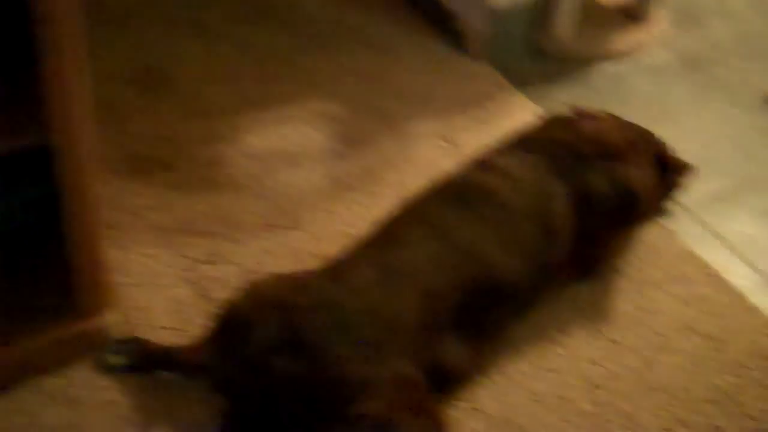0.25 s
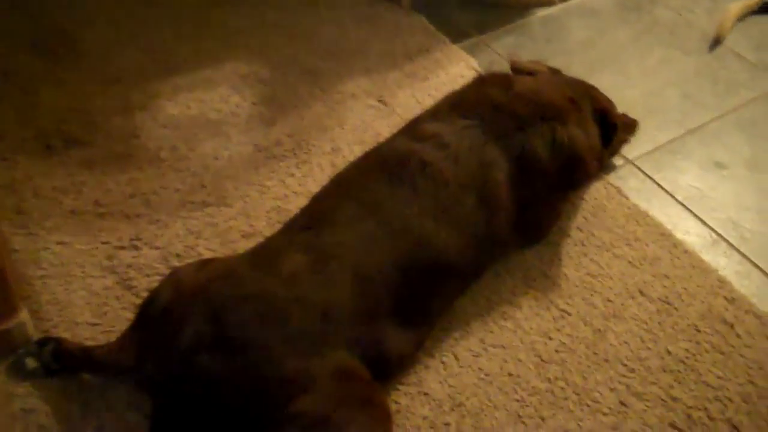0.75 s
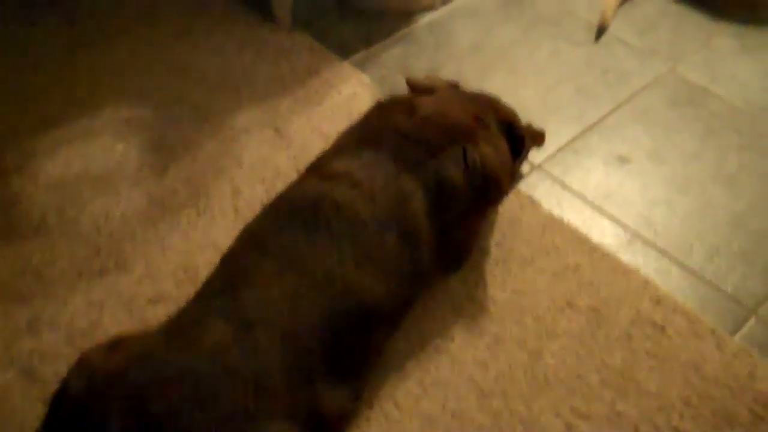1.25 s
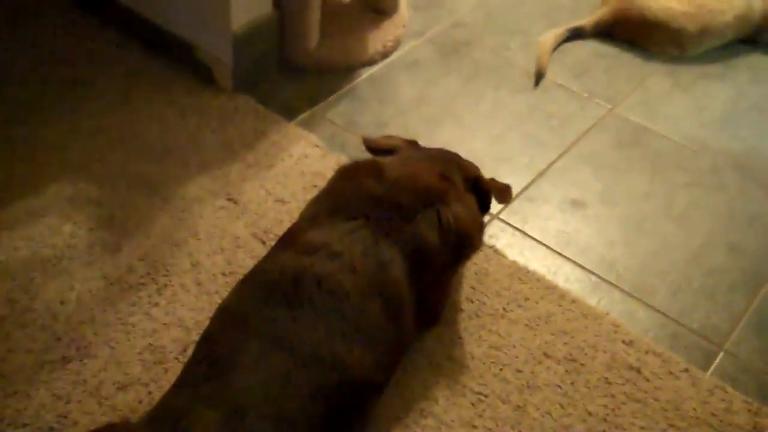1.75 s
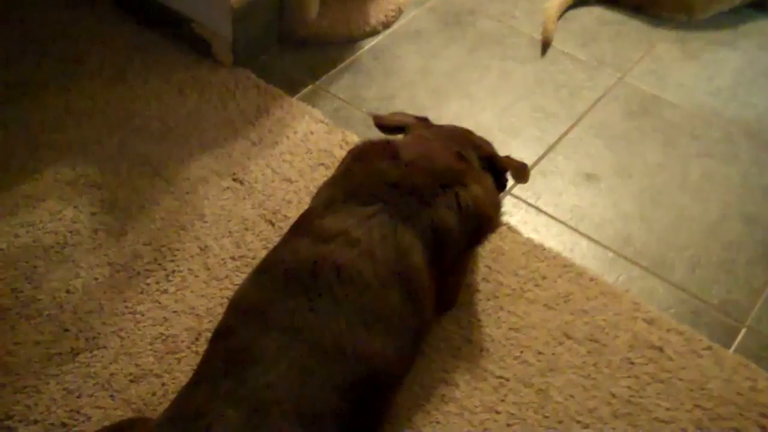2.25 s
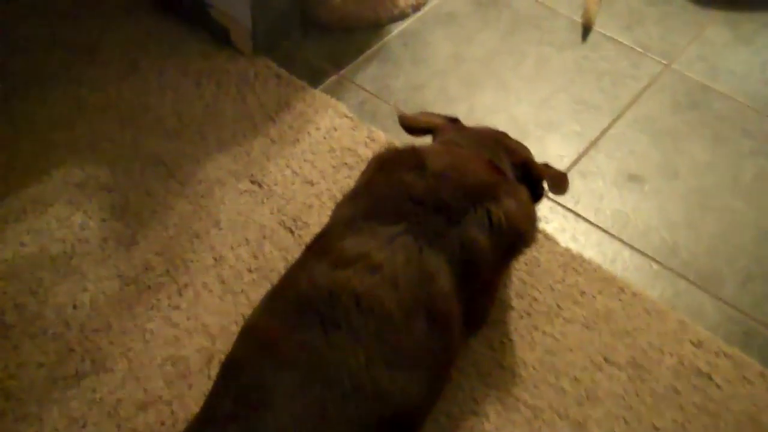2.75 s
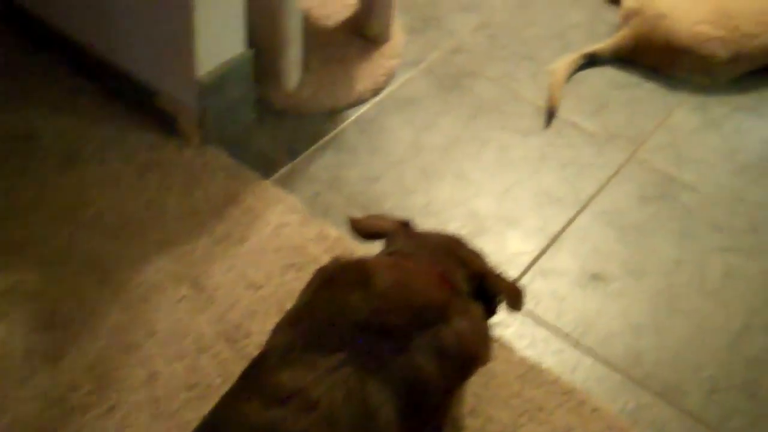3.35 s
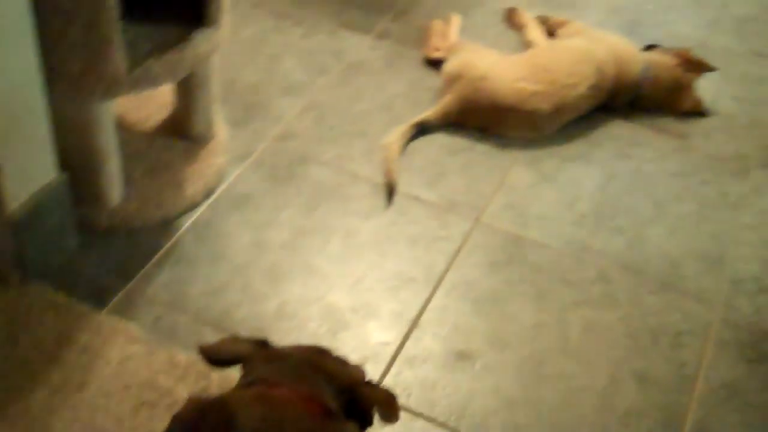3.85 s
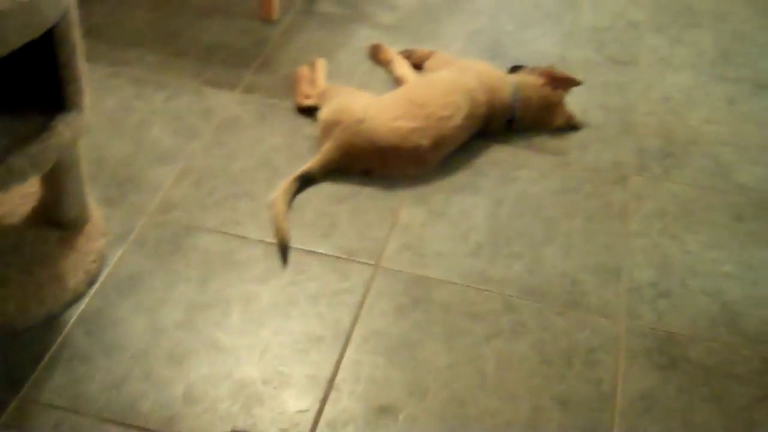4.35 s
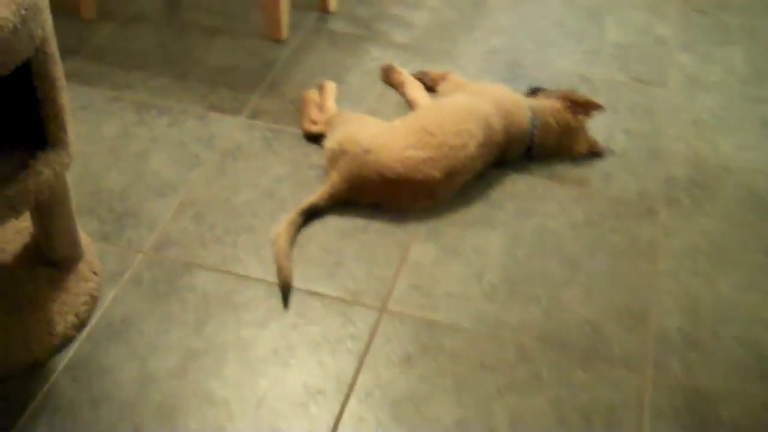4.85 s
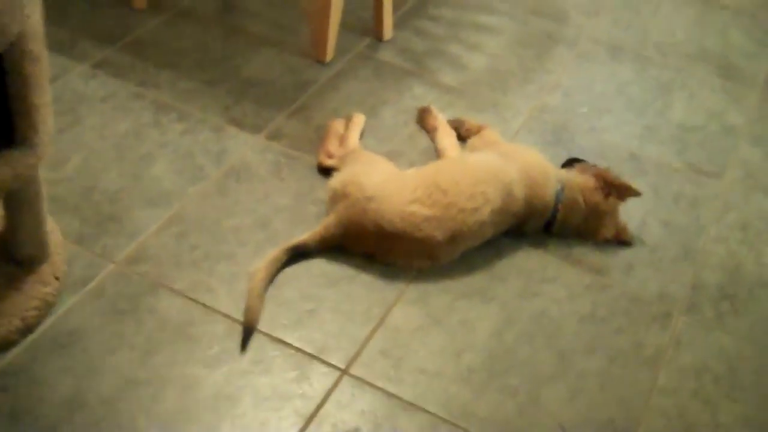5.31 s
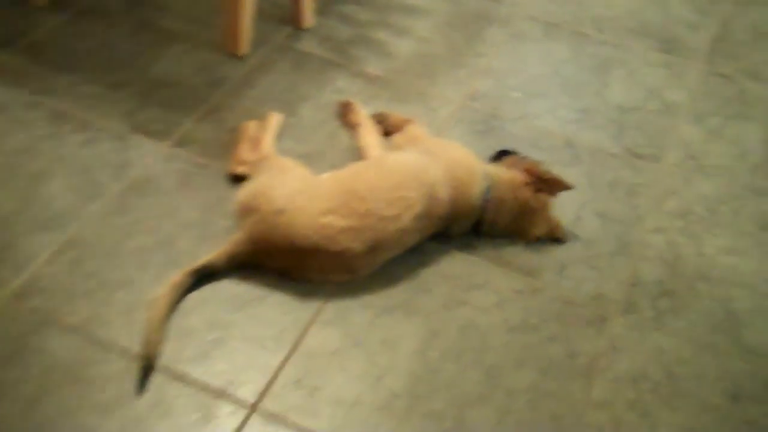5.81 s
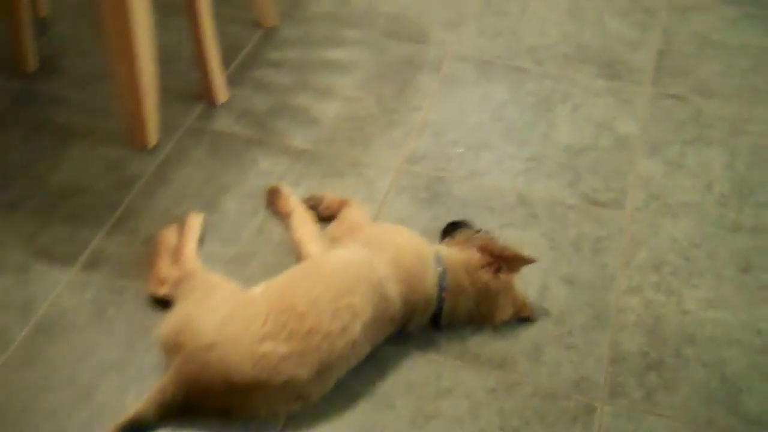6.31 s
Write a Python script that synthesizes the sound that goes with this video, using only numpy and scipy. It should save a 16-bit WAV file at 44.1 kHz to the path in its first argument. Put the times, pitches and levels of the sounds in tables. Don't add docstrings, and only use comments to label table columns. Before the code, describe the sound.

A small camera close to a dog picks up hiss and low hum, with faint paw pats and fur rustle. A sudden head shake sets thin metal tags chattering rapidly, with fleshy ear flaps underneath. Scattered clinks die down, a few dull paw knocks come, then the tags jingle once more, briefly, in a short hard-floored indoor reverb.

```python
import sys
import numpy as np
from scipy import signal
from scipy.fft import rfft, irfft, next_fast_len
from scipy.io import wavfile
from scipy.ndimage import uniform_filter1d, map_coordinates

SR = 44100
rng = np.random.default_rng(int(sys.argv[2]) if len(sys.argv) > 2 else 0)


def amplitude_ratio(level_db):
    exponent = np.asarray(level_db, float) / 20
    return 10 ** exponent


def generate_wav(signal):
    frames = np.transpose(np.atleast_2d(signal))
    scaled = np.clip(frames, -1, 1) * 32767
    pcm = np.round(scaled).astype(np.int16)
    wavfile.write(sys.argv[1], SR, pcm)


N = 289858

# hz, density_db_per_hz
HISS_COLOUR = [(18, -42), (30, -17), (91, -7.5), (131, 0), (271, -6.5), (360, -4.5), (409, -9.5),
               (867, -7.5), (1210, -13.5), (1660, -13), (3510, -16), (6690, -14.5), (8900, -24.5),
               (13500, -28), (14600, -29)]
# time_s, level_db
HISS_LEVEL = [(0, -55.5), (2, -55.5), (4, -53.5), (5.3, -52.5), (6.57, -54)]
# pitch_hz, rms_db
FRIDGE_HUM = [(58.6, -66.5), (117.5, -63), (235, -67.5)]
# hz, likeness_0_to_1
PORT_LIKENESS = [(60, 0.81), (150, 0.94), (370, 0.87), (920, 0.77), (2280, 0.94), (5680, 0.039),
                 (14100, 0.03)]
# hz, left_over_right_db
PORT_LEAN = [(60, -4), (150, 1.5), (370, 1.5), (920, 1), (2280, 0.5), (5680, -0.5), (14100, 5)]
# hz, left_over_right_db
DOG_SIDE = [(300, -3.5), (4000, -9.5), (7000, 3), (10000, 2.5), (12000, 11.5), (14000, 16.5)]
# hz, t60_s
TILE_DECAY = [(200, 0.21), (1000, 0.29), (6900, 0.33), (14000, 0.14)]
# hz, density_db_per_hz
FUR_COLOUR = [(250, -12), (500, -5.5), (1200, -4), (3500, -8), (6700, -0.5), (9000, -16), (14000, -39.5)]
# start_s, peak_db, t60_s
STROKES = [(0.0, -67, 0.94), (0.59, -57, 2.9), (1.33, -55, 0.64), (1.38, -49, 0.35), (1.85, -47.5, 5.6),
           (2.44, -38, 0.96), (2.6, -48, 1.1), (2.72, -38, 0.33), (2.94, -65, 0.69), (3.3, -60.5, 4.5),
           (3.82, -49.5, 1.1), (4.07, -46, 0.46), (4.4, -46.5, 1.07), (4.7, -45.5, 0.5), (5.06, -56, 1.3),
           (5.16, -54, 1.5)]
# start_s, peak_db
CLICKS = [
    (0.2175, -41),
    (0.2232, -33.5),
    (0.8955, -41),
    (4.3345, -38),
    (5.0655, -31),
]
# start_s, peak_db, centre_hz, t60_s
PAWS = [(0.213, -50, 226, 0.039), (0.6, -46.5, 147, 0.133), (1.139, -46, 400, 0.086),
        (1.379, -44, 970, 0.2), (3.595, -67, 237, 0.1), (3.869, -63, 385, 0.081), (4.09, -40, 322, 0.094),
        (4.417, -35, 670, 0.1), (4.446, -29.5, 408, 0.19), (4.488, -34, 377, 0.037), (4.7, -41, 326, 0.16),
        (4.807, -34.5, 355, 0.2), (6.211, -45, 213, 0.1), (6.319, -56, 310, 0.1)]
# start_s, peak_db, centre_hz, t60_s
EAR_SLAPS = [
    (1.987, -30, 952, 0.4),
    (2.095, -18.5, 410, 0.033),
    (2.198, -18.5, 717.6, 0.2),
    (2.293, -20.5, 1667, 0.12),
    (2.382, -16.5, 878.5, 0.1),
    (2.469, -31, 960, 0.072),
    (2.557, -32.5, 1750, 0.16),
    (2.638, -30.5, 358, 0.15),
    (2.725, -34.5, 1130, 0.12),
]
# pitch_hz, level_db, t60_s
THICK_TAG = [(4520, -25, 0.4), (6930, 0, 0.26), (6912, 1.5, 0.11), (6900, -6.5, 0.175), (7650, -30, 0.106),
             (10030, -5, 0.36)]
# pitch_hz, level_db, t60_s
THIN_TAG = [(5760, -8, 0.084), (5903, -5, 0.2), (6220, -12.5, 0.17), (6830, -8.5, 0.14), (9040, -18, 0.081),
            (10100, -12, 0.17), (10660, -5, 0.12), (12390, -22, 0.04), (12680, -15, 0.14),
            (13300, -18.5, .07), (14100, -17.5, 0.12)]
# hz, density_db_per_hz
CONTACT_COLOUR = [(1470, -24.5), (2500, -15), (3980, -11), (4440, -7), (4960, -9.5), (6860, 9), (7440, 0),
                  (8620, -3), (11000, -15), (11600, -19.5), (14600, -23)]
# start_s, peak_db, thin_over_thick_db, edge_brightness_db
FAINT_STRIKES = [
    (0.893, -49.5, -18, -10),
    (1.7245, -44, 7, -3),
    (4.334, -38.5, -10, -12),
    (4.597, -51, -10, 0),
]
WINDUP_STRIKES = [(1.7327, -31.5, -1.5, -13), (1.7622, -40.5, 8.5, 0), (1.821, -35, 1, -11),
                  (1.842, -47, -11.5, 14), (1.862, -48.5, -2, 11.5), (1.9155, -37.5, -16, 0.5),
                  (1.927, -49, -16, -3), (1.9438, -53, -3.5, -7), (1.9741, -40, 0, 0.5),
                  (2.0247, -33, 0, -7), (2.028, -15, -31, -13)]
SHAKE_STRIKES = [(2.054, -4.5, -7.5, -8), (2.0854, -28, -10, -4), (2.1317, -15, -9, -6),
                 (2.18, -18, -1, -16), (2.1898, -23, -4, -9.5), (2.218, -12, -15, -9),
                 (2.244, -18.5, -20, -9), (2.2807, -15, -6, -6), (2.3125, -15, -6, -5.5),
                 (2.3285, -13, -15, -12), (2.364, -13, -1.5, -11), (2.394, -10, -12, -13),
                 (2.444, -14.5, -16, -13), (2.465, -9, -12, -15.5), (2.514, -9, -15, -12.5),
                 (2.5786, -13, -10, -14), (2.6009, -10.5, -20, -10), (2.6268, -19, -22, -38),
                 (2.6417, -16.5, -20, -35), (2.6795, -13, -3, -8.5), (2.705, -12.5, -10.5, -14),
                 (2.734, -18.5, -12, -19), (2.7587, -12, -25, -26), (2.7826, -13.5, -18, -21),
                 (2.8219, -31, -22.5, -20), (2.8488, -24, -30, -15.5)]
SETTLE_STRIKES = [(2.888, -26, -21, -21), (2.9266, -24.5, 12.5, -10), (2.934, -24.5, 5, -9.5),
                  (2.9506, -18.5, -22.5, -17), (2.9727, -26, -3, -11.5), (3.015, -31, -13, -8),
                  (3.046, -24.5, -15, -11.5), (3.0847, -37, -19, -23), (3.1095, -30.5, -11.5, -16),
                  (3.1214, -30, -24, -18), (3.147, -29.5, -23, -20), (3.163, -24, -21, -20),
                  (3.183, -29, -32, -16.5), (3.2197, -61, -14, -16), (3.262, -59, -2, -13),
                  (3.2956, -20.5, -14, -14.5), (3.304, -10.5, -24, -27), (3.366, -29.5, -18, -22)]
LATE_STRIKES = [(4.948, -44.5, -4, 0.5), (4.9726, -62, -14, -15), (5.0347, -32.5, -4, -20),
                (5.065, -12, -11.5, -21.5), (5.0772, -23, -15.5, -24), (5.0856, -10, -9, -27),
                (5.0997, -21, -18, -28), (5.118, -32, -12.5, -24), (5.1465, -30, 3, -10),
                (5.163, -32.5, 1, -10.5), (5.1935, -22.5, -5.5, -12.5), (5.217, -23.5, -8, -26),
                (5.2352, -30.5, -9, -23), (5.2715, -21, -16, -21.5), (5.2878, -23.5, -21, -25),
                (5.3073, -33, -21, -24), (5.325, -39, -16, -28), (5.385, -41, -18, -28)]
# time_s, pan_left_db, slack_db (slack lets the tags chatter)
COLLAR = [(0.9, 13, 0), (1.73, 8, -0.5), (1.85, 5, -6), (1.95, 3, -2), (2.1, 7.5, 0), (2.22, 11, -0.5),
          (2.33, 7, -1.5), (2.48, 14.5, -1), (2.6, 9, -1), (2.8, 13, 1.5), (2.95, 10, -0.5),
          (3.17, 23.5, 0.5), (3.3, 6.5, -2), (4.3, 13, 4), (4.6, 6, 11.5), (5.06, -3, 1), (5.19, 5.5, 1),
          (5.4, 14, -5)]
# centre_hz, width_hz, depth_db
THINNED_BANDS = [(3700, 600, 13), (4900, 400, 10), (11450, 300, 7)]


def unit(x):
    return x / np.sqrt(np.mean(x ** 2) + 1e-20)


def along(points, hz):
    f, v = np.transpose(points)
    return np.interp(np.log(hz + 1), np.log(f + 1), v)


def curve(rows):
    s, v = np.transpose(rows)
    return np.interp(np.arange(N) / SR, s, v, left=-150, right=-150)


def wobble(rate_hz):
    knots = rng.standard_normal(int(N * rate_hz / SR) + 4)
    return map_coordinates(knots, [np.arange(N) * rate_hz / SR])


def filtered(x, response):
    m = next_fast_len(x.shape[-1] + 8192)
    return irfft(rfft(x, m) * response(np.fft.rfftfreq(m, 1 / SR)), m)[..., :x.shape[-1]]


def resonance(f, centre, width):
    return 1j * f * width / (centre ** 2 - f ** 2 + 1j * f * width)


def add(track, s, sound):
    part = track[..., round(s * SR):][..., :sound.shape[-1]]
    part += sound[..., :part.shape[-1]]


def dying(events, rise_s):
    out, t = np.zeros(N), np.arange(SR) / SR
    for s, db, t60 in events:
        rise = 1 - np.exp(-t / max(rise_s, 1e-4))
        add(out, s, amplitude_ratio(db - 60 * t / max(t60, .02)) * rise * (1 - t))
    return out


def paired(pair, colour):
    turn = lambda hz: np.arccos(np.clip(along(PORT_LIKENESS, hz), -1, 1)) / 2
    mid, side = filtered(pair, lambda hz: colour(hz) * [np.cos(turn(hz)), np.sin(turn(hz))])
    return np.array([mid + side, mid - side])


def background():
    z = signal.stft(rng.standard_normal((2, N)), nperseg=512)[2]
    patches = uniform_filter1d(rng.standard_normal(z.shape[1:]), size=12, axis=0)
    patches = uniform_filter1d(patches, size=16, axis=1)
    pair = signal.istft(z * amplitude_ratio(1.5 * unit(patches)), nperseg=512)[1][:, :N]
    hiss = unit(paired(pair, lambda hz: amplitude_ratio(along(HISS_COLOUR, hz))))
    hiss = amplitude_ratio(curve(HISS_LEVEL) + 1.0) * hiss
    t, hum = np.arange(N) / SR, 0
    for hz, db in FRIDGE_HUM:
        level = np.sqrt(2) * amplitude_ratio(db + 3.8 * wobble(7.8))
        hum = hum + level * np.sin(2 * np.pi * hz * t + .4 * wobble(2.6))
    return hiss + hum


def room(x, wet_db, reach):
    out, hop = np.zeros((2, N + SR)), SR // 8
    window = np.hanning(2 * hop + 1)[:-1]
    padded = np.pad(x, (hop, 2 * hop))
    for start in range(0, N, hop):
        hz, tail_s, z = signal.stft(rng.standard_normal((2, SR // 2)), SR, nperseg=64)
        decay = amplitude_ratio(-60 * tail_s / (reach * along(TILE_DECAY, hz)[:, None]))
        tail = paired(signal.istft(z * decay, SR, nperseg=64)[1], np.ones_like)
        piece = padded[start:start + 2 * hop] * window
        add(out, start / SR, signal.fftconvolve(piece[None], tail / np.linalg.norm(tail[0]), axes=1))
    return amplitude_ratio(wet_db) * out[:, hop:hop + N]


def brushing():
    grain = amplitude_ratio(2.0 * wobble(60)) * rng.standard_normal((2, N))
    ears = dying([(s, db - 11, 0.33) for s, db, _, _ in EAR_SLAPS], rise_s=0.0088)
    stirring = amplitude_ratio(-66)
    level = stirring + ears + dying(STROKES, rise_s=0.02)
    return level * unit(paired(grain, lambda hz: amplitude_ratio(along(FUR_COLOUR, hz))))


def clicks():
    out, t = np.zeros((2, N)), np.arange(SR // 100) / SR
    for s, db in CLICKS:
        puff = amplitude_ratio(-60 * t / 0.004) * rng.standard_normal((2, len(t)))
        tick = filtered(puff, lambda f: resonance(f, 5000, 4300) ** 2)
        add(out, s, amplitude_ratio(db + np.array([[6], [-6]])) * tick / np.abs(tick).max())
    return out


def thuds(events, sharpness, snap_db, low_hz):
    out, t = np.zeros(N), np.arange(SR // 4) / SR
    for s, db, hz, t60 in events:
        puff = amplitude_ratio(-60 * t / max(t60, .01)) * (1 - np.exp(-t / 0.0059)) * rng.standard_normal(len(t))
        tone = lambda f: resonance(f, hz, hz / sharpness) ** 2 + amplitude_ratio(snap_db) * resonance(f, 800, 2400) ** 2
        body = filtered(puff, lambda f: tone(f) * (1j * f / (low_hz + 1j * f)) ** 3)
        add(out, s, amplitude_ratio(db) * body / np.abs(body).max())
    return out


def strikes():
    rows = sorted(WINDUP_STRIKES + SHAKE_STRIKES + SETTLE_STRIKES + LATE_STRIKES + FAINT_STRIKES)
    s, db, thin_db, bright_db = np.transpose(rows)
    at, pan_db, slack_db = np.transpose(COLLAR)
    flight_s = np.diff(s, append=9)
    damping = 0.8 + 6 * np.minimum(flight_s, 0.05)
    chatter_db = db + bright_db + np.interp(s, at, slack_db) - 7
    return np.transpose([s, db, np.interp(s, at, pan_db), thin_db, bright_db, damping, flight_s, chatter_db])


def chatter():
    contacts = (rng.random(N) < 3000 / SR) * amplitude_ratio(3.36 * wobble(90)) * rng.standard_normal(N)
    level = dying([(s, db, 0.3) for s, *_, db in strikes()], rise_s=0.0058)

    def colour(f):
        metal = amplitude_ratio(0.5)
        for k, (hz, db, _) in enumerate(THICK_TAG + THIN_TAG):
            metal = metal + (-1) ** k * amplitude_ratio(db) * resonance(f, hz, 80)
        return amplitude_ratio(along(CONTACT_COLOUR, f)) * metal

    band = np.std(filtered(contacts, lambda f: colour(f) * (abs(f - 8500) < 1000)))
    return amplitude_ratio(-3.5) * filtered(level * contacts / band, colour) * amplitude_ratio([[2.5], [-2.5]])


def ring(modes, t, damping, bright_db, swing, twirl_hz):
    hz, db, t60 = np.transpose(modes)[:, :, None]
    chance = rng.standard_normal((5, len(modes), 1))
    fade_db = 60 * t / (t60 * np.clip(damping, .1, 3))
    level = db + 3 * chance[0] + bright_db * (hz > 8500) - fade_db
    twirl = 1 + 0.6 * np.cos(2 * np.pi * twirl_hz * amplitude_ratio(3.59 * chance[3]) * t + 1.5 * chance[4])
    tone = np.sin(2 * np.pi * hz * (1 + swing * chance[1]) * t + 3 * chance[2])
    return np.sum(amplitude_ratio(level) * twirl * tone, axis=0)


def tags():
    out, t = np.zeros((2, N)), np.arange(SR * 2 // 5) / SR
    for s, db, pan_db, thin_db, bright_db, damping, flight_s, _ in strikes():
        thick = ring(THICK_TAG, t, damping, bright_db, swing=0.002, twirl_hz=28.2)
        thin = ring(THIN_TAG, t, damping, bright_db - thin_db, swing=.008, twirl_hz=89.6)
        thin = amplitude_ratio(thin_db + 6.5) * thin
        burst = amplitude_ratio(bright_db + 21.5 - 60 * t / 0.027) * rng.standard_normal(len(t))
        crack = filtered(burst, lambda f: amplitude_ratio(along(CONTACT_COLOUR, f)))
        choke = amplitude_ratio(-9 * np.clip((t - flight_s) / 0.0015 + 1, 0, 1))
        onset = 1 - np.exp(-t / 0.00089)
        strike = amplitude_ratio(db - 10) * onset * choke * (thick + thin + crack)
        add(out, s, strike * amplitude_ratio([[pan_db / 2], [-pan_db / 2]]))
    return out


def scene():
    metal = tags() + chatter()
    ears = thuds(EAR_SLAPS, sharpness=1.16, snap_db=-3, low_hz=196.8)
    paws = thuds(PAWS, sharpness=1.03, snap_db=-18.5, low_hz=79.3)
    skin = ears + paws
    centre = metal.mean(axis=0)
    near_walls = room(centre, wet_db=-2.0, reach=0.059) * amplitude_ratio([[3], [-3]])
    scattered = amplitude_ratio(-4) * metal + near_walls
    near = filtered(scattered, lambda f: amplitude_ratio(np.outer([.5, -.5], along(DOG_SIDE, f)))) + skin
    far = room(centre, wet_db=-3, reach=0.59) + room(skin, wet_db=-6.0, reach=1.0)
    return near + far + brushing() + background() + clicks()


def thinned(x, under_db, low_hz):
    mid, side = (x[0] + x[1]) / 2, (x[0] - x[1]) / 2
    hz, _, z = signal.stft(mid, SR, window="cosine", nperseg=2048)
    edges = np.arange(0, len(hz), 16)
    power = np.add.reduceat(abs(z) ** 2, edges)
    treble = np.median(power[(hz[edges] > 5200) & (hz[edges] < 14000)], axis=0)
    poor_db = 0
    for centre, width, db in THINNED_BANDS:
        poor_db = poor_db + db * np.exp(-((hz[edges] + 170 - centre) / width) ** 2)
    mood_db = 4 * unit(uniform_filter1d(rng.standard_normal(power.shape), size=3, axis=1))
    kept = power > amplitude_ratio(2 * (under_db + poor_db[:, None] + mood_db)) * treble
    kept = kept[np.arange(len(hz)) // 16] | (hz < low_hz)[:, None]
    mid = signal.istft(z * kept, SR, window="cosine", nperseg=2048)[1][:N]
    return np.array([mid + side, mid - side])


def band_limit(x):
    return signal.sosfilt(signal.butter(12, 14700, fs=SR, output="sos"), x)


def record(dry):
    lean = lambda f: amplitude_ratio(np.outer([.5, -.5], along(PORT_LEAN, f)))
    delay = lambda f: np.exp(-1j * np.pi * np.outer([1, -1], f) * 3.62 / SR)
    heard = np.clip(filtered(dry, lambda f: lean(f) * delay(f)), -.9, .9)
    mix = thinned(heard, under_db=-19, low_hz=2220)
    mix = filtered(mix, lambda f: 1 / (1 + (f / 14280) ** 300))
    return band_limit(np.clip(mix, -1, 1))


dry = scene()
out = record(dry)
generate_wav(out)
```